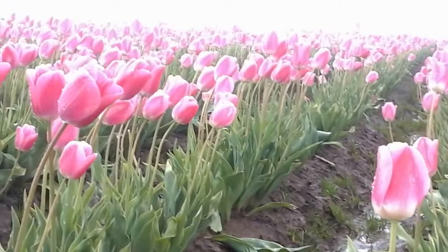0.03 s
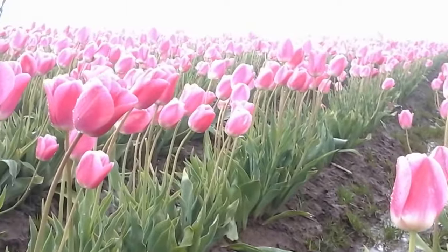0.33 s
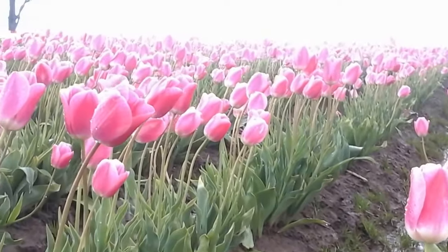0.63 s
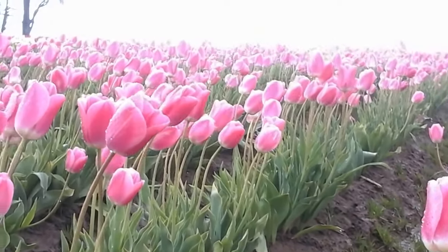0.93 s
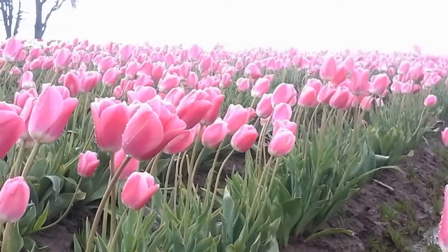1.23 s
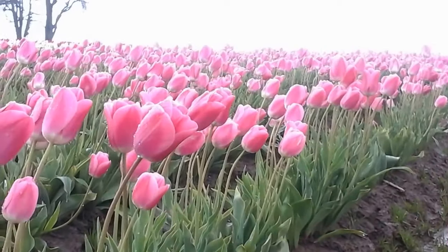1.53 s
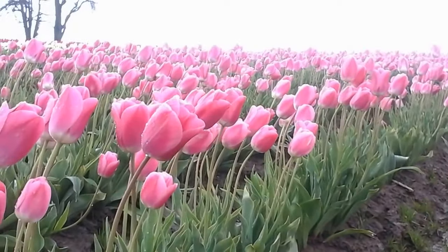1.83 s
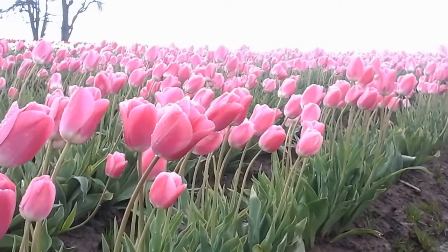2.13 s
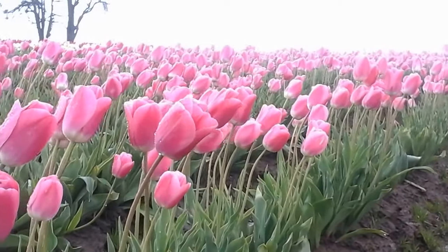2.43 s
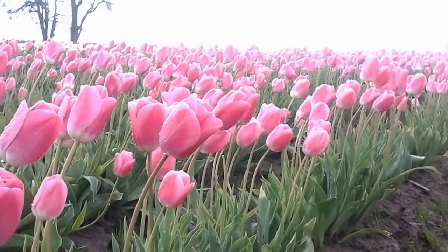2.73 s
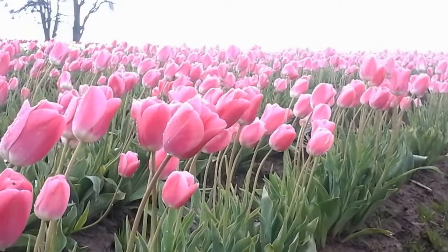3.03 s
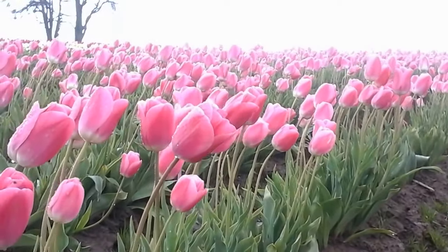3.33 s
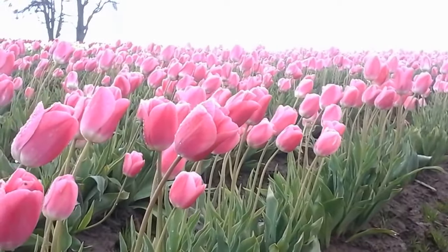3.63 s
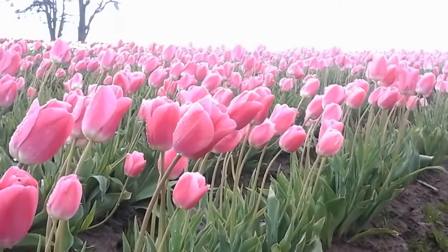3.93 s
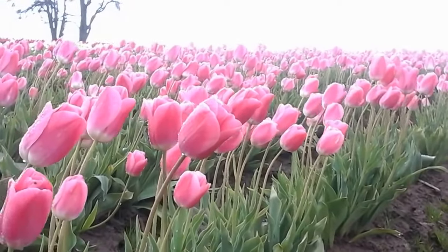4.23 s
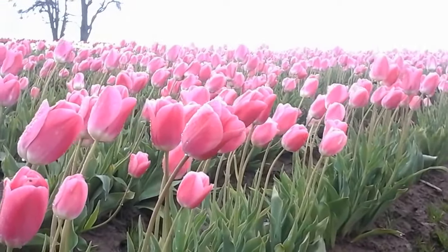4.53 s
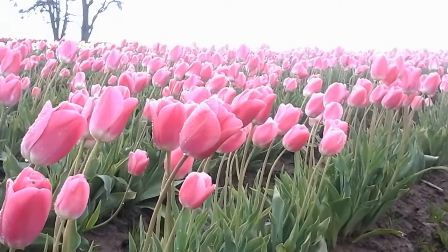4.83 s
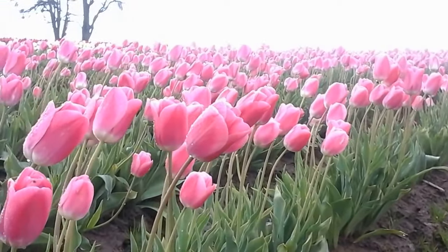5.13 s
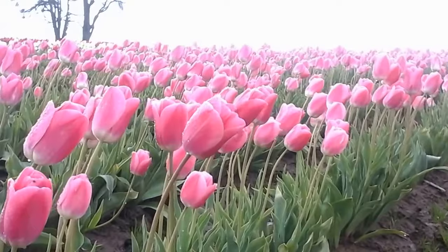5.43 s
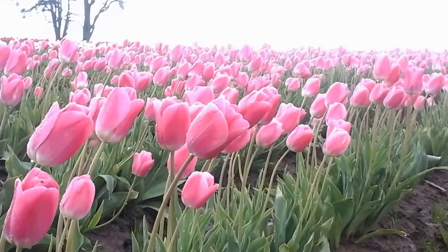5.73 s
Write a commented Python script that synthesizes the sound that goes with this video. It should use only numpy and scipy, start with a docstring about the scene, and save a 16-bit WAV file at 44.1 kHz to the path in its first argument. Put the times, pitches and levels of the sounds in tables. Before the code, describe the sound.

Rain patters throughout on a tight cover close overhead, probably an umbrella, in an open tulip field. The heavier drops land irregularly, many each second, each making a sharp, high tick together with a dull pat on the fabric. Lighter drops fill the gaps, and a soft, steady hiss of rain on leaves lies behind.

A low breeze rumbles on the microphone, with brief bumps at about 0.5 and 1.3 seconds. From around 2.4 to 2.9 seconds a strong gust buffets it with a quick run of thumps. This is the loudest moment, and the rain dips briefly beneath it. The wind eases by about 3.3 seconds. Smaller gusts return from roughly 4.3 seconds and grow a little stronger toward the end at 6 seconds, while the drops keep ticking.

```python
"""Raindrops patter close overhead on a tight cover, likely an umbrella, in an open flower field.
Each drop gives the fabric a dull pat and makes the opening of a camera's microphone ring: a sharp
tick near 5 kHz. Lighter drops and the hiss of rain on the leaves lie behind.
Gusts rise out of a steady breeze and rumble and thump on the microphone, hardest in the middle."""
import sys
import numpy as np
from scipy import signal
from scipy.fft import rfft, irfft, next_fast_len
from scipy.io import wavfile
from scipy.ndimage import uniform_filter1d, map_coordinates

SR = 44100
rng = np.random.default_rng(int(sys.argv[2]) if len(sys.argv) > 2 else 0)


def master(y):
    """Save y as 16-bit WAV."""
    cut = np.clip(np.atleast_2d(y).T, -1, 1)
    pcm = np.round(cut * 32767)  # scale
    wavfile.write(sys.argv[1], SR, pcm.astype(np.int16))


N = 264159


def heavy_drops():
    """The biggest drops hit the cover one by one."""
    # when each drop lands and how strong its two parts are: start_s, tick_db, pat_db
    drops = [(0.0264, -16.5, -19), (0.1537, -22, -29.5), (0.2068, -19, -22), (0.2212, -24.5, -34),
             (0.3864, -17.5, -28), (0.4823, -21.5, -38), (0.5189, -25, -28.5), (0.583, -28, -43),
             (0.5871, -14, -23.5), (0.6165, -23, -28), (0.6883, -22.5, -29), (0.7073, -17, -25.5),
             (0.7362, -26, -23.5), (0.751, -22, -51), (0.7987, -16.5, -48), (0.9713, -23, -23),
             (0.9759, -20.5, -29), (1.0045, -14, -40), (1.0186, -20, -24.5), (1.0502, -19, -22.5),
             (1.0704, -26, -41), (1.1183, -16.5, -23), (1.2224, -20, -27), (1.4161, -17, -26),
             (1.4358, -15, -24.5), (1.4625, -23.5, -23.5), (1.507, -27, -28.5), (1.5394, -15.5, -20),
             (1.5601, -15, -25), (1.5941, -22.5, -41), (1.6332, -26, -41), (1.642, -25.5, -35),
             (1.7149, -19.5, -26), (1.7743, -18, -21), (1.8103, -23, -29), (1.8416, -23.5, -29.5),
             (1.8957, -22, -35), (1.9259, -18.5, -28), (1.9697, -22, -37), (2.0129, -16, -19.5),
             (2.0577, -23, -30), (2.0906, -22.5, -26), (2.1075, -23, -29), (2.1159, -19, -23),
             (2.1316, -19, -38), (2.1393, -17.5, -27), (2.1564, -14, -32), (2.1719, -23, -39),
             (2.18, -26, -32), (2.2263, -22.5, -26.5), (2.2556, -22.5, -38), (2.2789, -24.5, -29),
             (2.3155, -22, -25), (2.3219, -27, -40), (2.3299, -22.5, -28), (2.3729, -19, -28.5),
             (2.3887, -28, -27), (2.4358, -17, -24), (2.4488, -17.5, -27), (2.5438, -21, -34),
             (2.5643, -17, -41), (2.6785, -16, -37), (2.713, -18.5, -24), (2.8158, -18, -19),
             (2.8456, -20, -34), (2.95, -24.5, -26), (2.9548, -12.5, -24), (2.9805, -24, -29),
             (3.1588, -23, -31), (3.1937, -19, -22), (3.2468, -23.5, -29), (3.3156, -16, -24.5),
             (3.3447, -29.5, -44), (3.4126, -23, -44), (3.419, -16.5, -23), (3.4383, -26, -41),
             (3.4851, -14, -26), (3.5065, -19.5, -37), (3.6109, -37, -26.5), (3.6439, -23, -38),
             (3.6551, -20, -28), (3.7386, -25, -33), (3.7442, -21.5, -27.5), (3.7486, -17.5, -37),
             (3.8878, -27.5, -23), (3.9267, -17.5, -24), (3.9533, -17, -20.5), (3.9778, -19, -27.5),
             (4.0642, -22, -22.5), (4.143, -16.5, -46), (4.1695, -23, -25.5), (4.2088, -20.5, -27),
             (4.2255, -18, -16.5), (4.2428, -23, -20.5), (4.2833, -19.5, -22.5), (4.3712, -20, -21),
             (4.3791, -18, -26), (4.3853, -26, -30), (4.3999, -13.5, -22), (4.48, -28, -44),
             (4.4886, -18, -26), (4.4948, -16.5, -22.5), (4.5146, -25, -26), (4.5532, -26, -36),
             (4.7374, -26.5, -28), (4.7936, -25, -31), (4.8619, -23, -37), (4.9076, -20, -33),
             (4.9282, -24, -31), (4.9394, -22.5, -31), (4.9811, -21.5, -36), (5.0074, -14.5, -21),
             (5.0233, -23, -39), (5.0329, -25, -18.5), (5.1294, -16.5, -26), (5.1547, -20, -23),
             (5.1955, -18, -21.5), (5.242, -26, -25), (5.3564, -24, -45), (5.3968, -21.5, -22),
             (5.5864, -19, -30), (5.6745, -16.5, -19.5), (5.7294, -26, -50), (5.7788, -11.5, -29.5),
             (5.8271, -21, -23.5), (5.8328, -27, -45), (5.8526, -18, -26.5), (5.9611, -20, -25)]
    return patter(drops)


def light_drops(loudest_db, range_db, pat_db, softness_db, count):
    """Smaller drops land at random, more often as the shower swells; weak ones are the most common."""
    # how thickly the light rain falls: time_s, relative_rate
    shower = [(0, .5), (.7, 1), (1.3, .6), (2.1, 1.3), (2.6, .9), (3.9, 1.3), (4.9, 1.4), (5.6, .9),
              (5.99, 1)]
    jitter, weakness, softness = rng.random((count, 3)).T
    t = np.linspace(0, N / SR, count)
    fallen = np.cumsum(np.interp(t, *np.transpose(shower)))
    start_s = np.interp((np.arange(count) + jitter) / count, fallen / fallen[-1], t)
    tick_db = loudest_db - range_db * np.sqrt(weakness)
    fabric_db = tick_db + pat_db + softness_db * (softness - .5)
    return patter(np.column_stack([start_s, tick_db, fabric_db]))


def patter(drops):
    """Each drop (start_s, tick_db, pat_db) rings the microphone opening, pats the fabric and bursts."""
    # the sharp tick of the ringing opening: pitch_hz, level_db
    tick_tone = [(300, -29), (2000, -16.5), (3300, -10.5), (4300, -4.5), (5030, 3), (5600, -7),
                 (6500, -15.5), (8000, -23), (11000, -30), (15500, -48)]
    # the dull pat of the fabric: pitch_hz, level_db
    pat_tone = [(60, -27), (250, -7), (600, -3), (1200, -2), (2000, -1.5), (2800, -1.5), (4000, -9),
                (7000, -15.5), (15000, -26)]
    # the spray as a drop bursts: pitch_hz, level_db
    spray_tone = [(1000, -31), (4500, -19), (7000, 12), (10000, 5), (15500, 0)]
    start_s, tick_db, pat_db = np.transpose(drops)
    ring, wetness, fineness, spot = rng.standard_normal((len(start_s), 4)).T  # no two drops are alike
    blows = impacts(len(start_s))
    length = blows.shape[1]
    tick = set_level(resonate(blows, tick_tone, amp(0.33 * ring)), tick_db + 0.21)
    pat = set_level(resonate(blows, pat_tone, amp(0.62 * spot)), pat_db - 1.7)
    ping = set_level(fabric_ring(spot, length), pat_db - 5)
    spray_db = 1.28 * tick_db - 15 + 2.6 * np.tanh(wetness)  # big drops burst harder
    spray = set_level(resonate(blows, spray_tone, amp(2.24 * fineness)), spray_db)
    at = np.round(start_s * SR).astype(int)[:, None] + np.arange(length)
    return mix_at(at, tick + pat + ping + spray)


def impacts(count, shiver_s=0.0059, tail_s=0.051, echo_s=0.0061, size=2048):
    """One row per drop: a sudden push, the fabric's brief shiver, a weak tail and an echo from below."""
    t = np.arange(size) / SR
    chance = rng.standard_normal((count, size + 3))
    shake, delay, strength = chance[:, :3].T[:, :, None]
    shiver = amp(-18 + 1.9 * shake - 60 * t / shiver_s)  # fades by 60 dB in shiver_s
    tail = amp(-28 - 60 * t / tail_s)
    since_echo = t - echo_s * amp(.5 * delay)  # the path differs with the spot that is hit
    echo = amp(-29 + 2.6 * strength - 60 * np.abs(since_echo) / shiver_s) * (since_echo > 0)
    blows = (shiver + tail + echo) * chance[:, 3:]
    blows[:, 0] = 1  # the push
    return blows


def fabric_ring(spot, size, middle_hz=1492, fade_s=0.0092):
    """One row per drop: the struck spot of fabric rings briefly at a pitch of its own."""
    t = np.arange(size) / SR
    pitch_hz = middle_hz * amp(2.5 * spot)[:, None]
    return np.sin(2 * np.pi * pitch_hz * t) * amp(-60 * t / fade_s)


def wind():
    """Gusts rumble at the microphone opening; faster air breaks into finer swirls."""
    # the low rumble of large swirls: pitch_hz, level_db
    rumble_tone = [(20, -42), (32, -42), (50, -7.5), (70, 0.5), (115, 1), (190, -6), (270, -17.5),
                   (450, -56), (900, -94)]
    # the higher rush of small swirls: pitch_hz, level_db
    swirl_tone = [(100, -53), (170, -0.5), (240, -0.5), (340, -3), (480, -14.5), (700, -21), (1100, -87),
                  (2500, -79)]
    # the ragged edge of a strong gust: pitch_hz, level_db
    flutter_tone = [(200, -37), (450, 2.5), (650, -7), (1000, -10.5), (1500, -30), (3000, -120)]
    rumble_db, swirl_db = gusts()
    rumble = rough_air(rumble_tone, steady_s=0.045, lumps_db=4.5, lumps_per_s=40)
    swirls = rough_air(swirl_tone, steady_s=0.035, lumps_db=9, lumps_per_s=70)
    flutter = rough_air(flutter_tone, steady_s=0.026, lumps_db=13, lumps_per_s=82)
    flutter_db = -31.5 + 1.88 * (np.minimum(swirl_db, -14) + 18.5)  # outgrows the gust, then levels off
    return amp(rumble_db + 3) * rumble + amp(swirl_db) * swirls + amp(flutter_db) * flutter


def gusts(rise_s=0.034, fall_s=0.044):
    """Levels in dB of the rumble and small swirls: each gust rises, holds and falls over the breeze."""
    # the breeze under the gusts: time_s, rumble_db
    breeze = [(0, -40.5), (.7, -38), (1.5, -37.5), (2, -46), (2.3, -27.5), (3.35, -39), (4.2, -40),
              (5.1, -31), (5.99, -28.5)]
    # gusts on the microphone: start_s, hold_s, rumble_db, swirl_db
    gust_list = [(.485, 0.068, -28.5, -34), (.762, .012, -35, -34), (1.25, 0.07, -23, -29.5),
                 (1.68, 0.044, -31, -36.5), (2.157, 0.015, -26.5, -41), (2.38, 0.034, -19.5, -22),
                 (2.467, .385, -21, -24.5), (2.565, .1, -12.5, -14.5), (2.795, 0.052, -21.5, -20),
                 (2.975, 0.284, -27, -28), (3.46, 0.022, -35, -38), (3.7, 0.088, -33, -39.5),
                 (3.872, 0.025, -30, -31.5), (3.98, 0.18, -39, -37), (4.32, 0.022, -27, -30.5),
                 (4.469, 0.052, -29, -28), (4.572, 0.046, -29.5, -22), (4.681, .025, -25.5, -29.5),
                 (4.81, 0.094, -24.5, -40), (5.12, 0.021, -23, -32.5), (5.385, 0.045, -28, -24),
                 (5.48, 0.026, -25, -46), (5.687, 0.077, -21.5, -28), (5.868, 0.039, -23, -20.5),
                 (5.933, 0.067, -20, -21)]
    t = np.arange(N) / SR
    rumble = amp(np.interp(t, *np.transpose(breeze))) ** 2
    swirls = rumble * amp(-12) ** 2  # a light breeze makes few small swirls
    for start_s, hold_s, rumble_db, swirl_db in gust_list:
        before = np.maximum(start_s - t, 0) / rise_s
        after = np.maximum(t - start_s - hold_s, 0) / fall_s
        power = 0.01 ** np.minimum(before + after, 6)  # 20 dB for each rise_s or fall_s
        rumble += power * amp(rumble_db) ** 2
        swirls += power * amp(swirl_db) ** 2
    return 10 * np.log10(rumble), 10 * np.log10(swirls)


def rough_air(tone, steady_s, lumps_db, lumps_per_s):
    """Swirling air: noise is evened out in strength, then broken into quick lumps."""
    air = noise(tone)
    power = np.abs(uniform_filter1d(air ** 2, int(steady_s * SR)))
    even = air / np.sqrt(power + 1e-6)
    return unit(even * amp(lumps_db * wobble(lumps_per_s)))


def wind_thumps(cycles, steepen, size=1200):
    """A single swirl is a swing or two of air pressure; strong ones are steeper and sound brighter."""
    # the hardest swirls that hit the microphone: peak_s, level_db, pitch_hz
    thumps = [(0.489, -11, 436), (1.277, -6.5, 252), (1.308, -12, 203), (2.168, -13, 168),
              (2.382, -5.5, 292), (2.404, -4.5, 216), (2.473, -2, 180), (2.493, -1.5, 195), (2.515, 0, 223),
              (2.539, 0, 264), (2.57, 2.5, 330), (2.587, 0, 372), (2.608, -0.5, 240), (2.624, -1, 225),
              (2.642, 1, 194), (2.681, -1, 287), (2.715, -6, 295), (2.769, -9.5, 195), (2.8, -4, 269),
              (2.854, -1.5, 330), (2.979, -6, 226), (3.187, -6.5, 177), (3.224, -11, 186),
              (4.343, -14.5, 266), (4.415, -15, 245), (4.472, -11, 204), (4.58, -6, 280), (4.689, -11, 357),
              (5.274, -10.5, 225), (5.322, -7.5, 267), (5.387, -7.5, 190), (5.69, -4, 187),
              (5.755, -8, 182), (5.877, -9, 240), (5.947, -3.5, 193)]
    peak_s, level_db, pitch_hz = np.transpose(thumps)[:, :, None]
    offset = np.arange(-size, size)
    turns = pitch_hz * offset / SR
    phase = 2 * np.pi * (turns + rng.random(peak_s.shape))
    swell = amp(level_db) / np.cosh(np.clip(turns / cycles, -20, 20))
    swing = swell * np.sin(phase + steepen * np.sqrt(swell) * np.sin(phase))
    return mix_at(np.round(peak_s * SR).astype(int) + offset, swing)


def field_hiss():
    """Rain on the leaves all around blends into a steady hiss."""
    # the tone of that hiss: pitch_hz, level_db
    hiss_tone = [(100, 13.5), (500, -12), (1200, -2), (3000, -4), (4200, -2.5), (5050, 5), (6300, -10.5),
                 (8000, -17.5), (12000, -20), (15500, -21)]
    return amp(-44) * noise(hiss_tone)


def amp(db):
    """Turn decibels into a number to multiply by."""
    return 10 ** (np.asarray(db) / 20)


def unit(x):
    """Scale x to an average power of 1."""
    return x / np.sqrt(np.mean(x ** 2) + 1e-20)


def set_level(rows, level_db, size=125):
    """Scale each row so that its first size samples have the given level."""
    strength = np.sqrt(np.mean(rows[:, :size] ** 2, axis=1))
    return rows * (amp(level_db) / strength)[:, None]


def mix_at(at, sounds):
    """Add short sounds into one track at the given sample positions."""
    return np.bincount(at.ravel(), sounds.ravel(), N)[:N]


def tone_gain(tone, hz):
    """The gain at hz, read between the points of a (pitch_hz, level_db) table."""
    pitch_hz, level_db = np.transpose(tone)
    return amp(np.interp(np.log(hz + 1), np.log(pitch_hz + 1), level_db))


def wobble(rate):
    """A smooth random curve between -1 and 1, with rate new values a second."""
    points = rng.standard_normal(int(N * rate / SR) + 4)
    return np.tanh(map_coordinates(points, [np.arange(N) * rate / SR]))


def filtered(x, gain_at):
    """Turn each frequency in x up or down by gain_at(hz)."""
    size = next_fast_len(N + SR // 4)
    hz = np.fft.rfftfreq(size, 1 / SR)
    return irfft(rfft(x, size) * gain_at(hz), size)[:N]


def noise(tone):
    """Noise with the given tone and an average power of 1."""
    return unit(filtered(rng.standard_normal(N), lambda hz: tone_gain(tone, hz)))


def resonate(blows, tone, pitch_ratio, size=2048):
    """Make each blow ring with the given tone, moved up or down by its own pitch ratio."""
    hz = np.fft.rfftfreq(size, 1 / SR) / pitch_ratio[:, None]
    folded = irfft(np.log(tone_gain(tone, hz)))
    folded[:, 1:size // 2] *= 2  # fold in time, so the ringing never comes before the blow
    folded[:, size // 2 + 1:] = 0
    ringing = irfft(np.exp(rfft(folded)))[:, :size // 4]
    return signal.fftconvolve(blows, ringing, axes=1)[:, :blows.shape[1]]


def turn_down(x, threshold_db, window_s):
    """The volume sinks while the sound stays loud, so the rain dips under a strong gust."""
    size = int(window_s * SR)
    power = np.abs(uniform_filter1d(uniform_filter1d(x ** 2, size), size))
    return x / (1 + (power / amp(threshold_db) ** 2) ** 2) ** (1 / 4)


def scene():
    """Heavy, medium and fine drops, the field and the wind, in one channel."""
    medium = light_drops(loudest_db=-23.5, range_db=6, pat_db=-8, softness_db=13.5, count=60)
    fine = light_drops(loudest_db=-27, range_db=17, pat_db=-6.5, softness_db=15, count=600)
    rain = heavy_drops() + medium + fine + field_hiss()
    return (rain + wind() + amp(0.76) * wind_thumps(cycles=0.29, steepen=0.7))[None]


def record(dry):
    """The camera turns loud gusts down, rounds off peaks and cuts the deepest bass and highest treble."""
    ceiling, bass_hz, top_hz = .92, 36, 15700
    held = turn_down(dry[0], threshold_db=-10.5, window_s=0.075)
    rounded = held / (1 + np.abs(held / ceiling) ** 6) ** (1 / 6)
    return filtered(rounded, lambda hz: (hz < top_hz) * hz ** 4 / (hz ** 4 + bass_hz ** 4))[None]


dry = scene()
out = record(dry)
master(out)
```